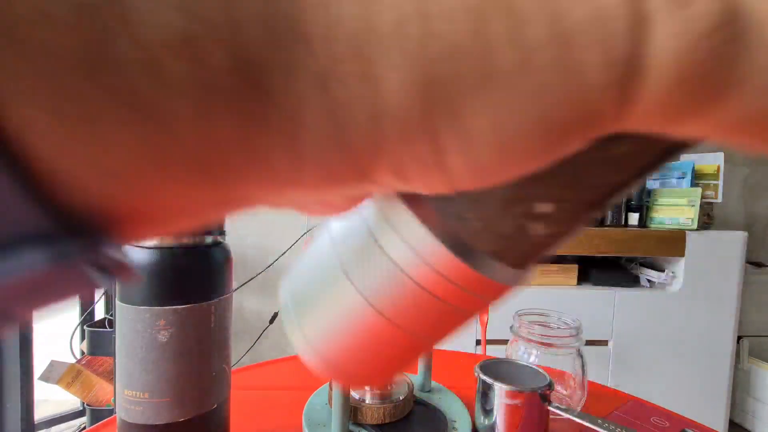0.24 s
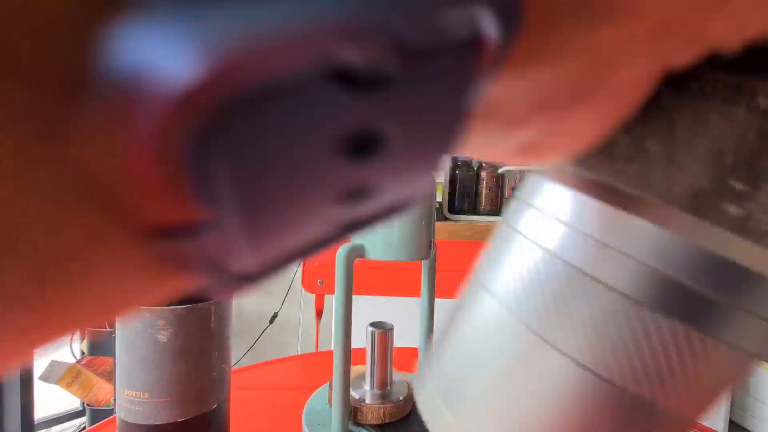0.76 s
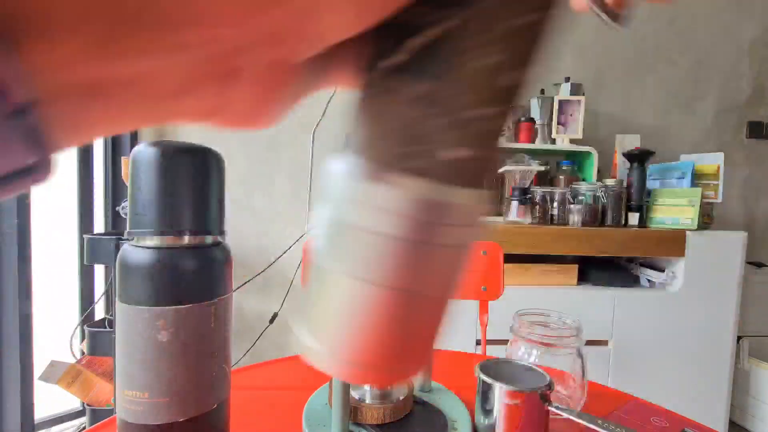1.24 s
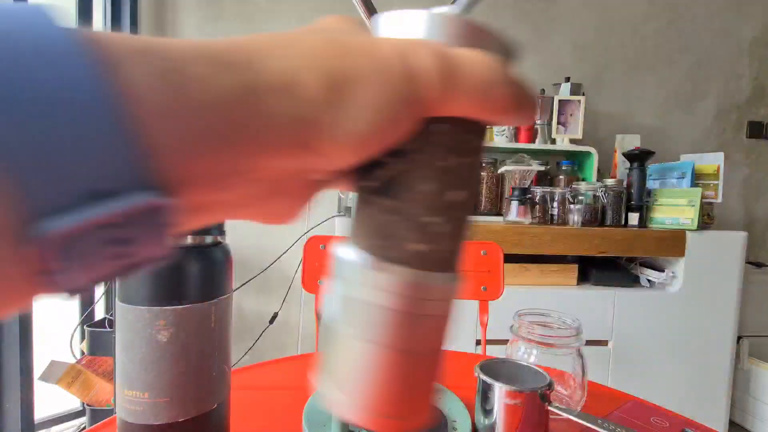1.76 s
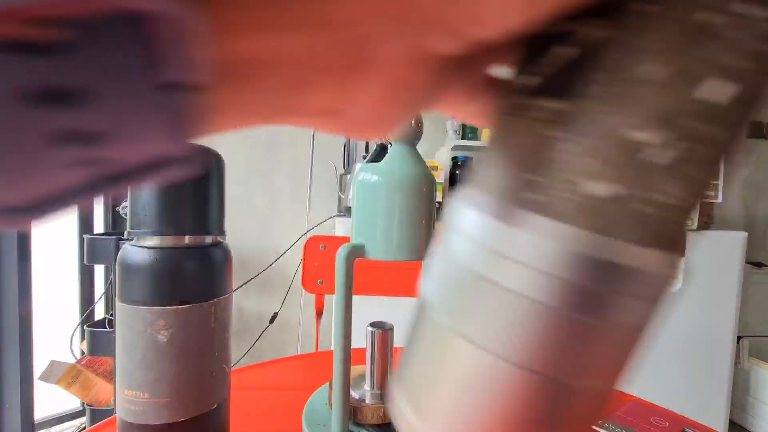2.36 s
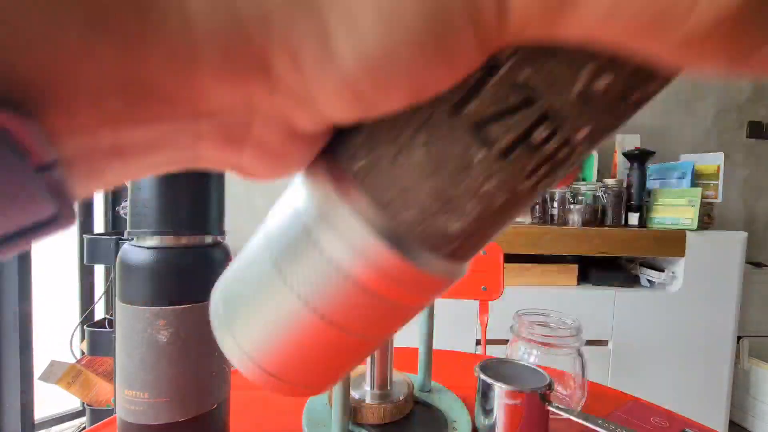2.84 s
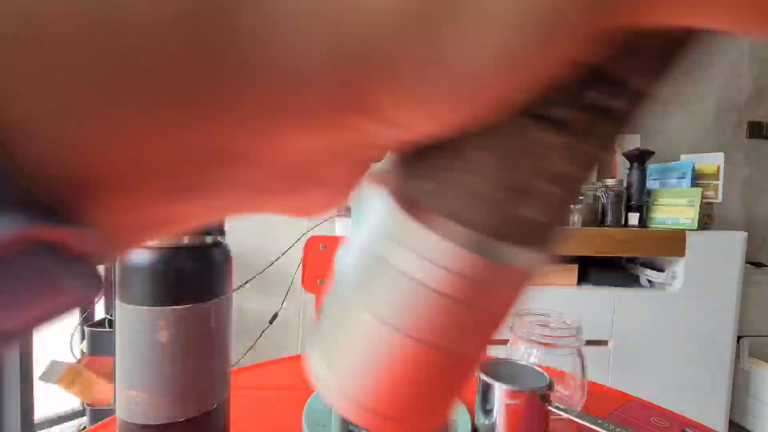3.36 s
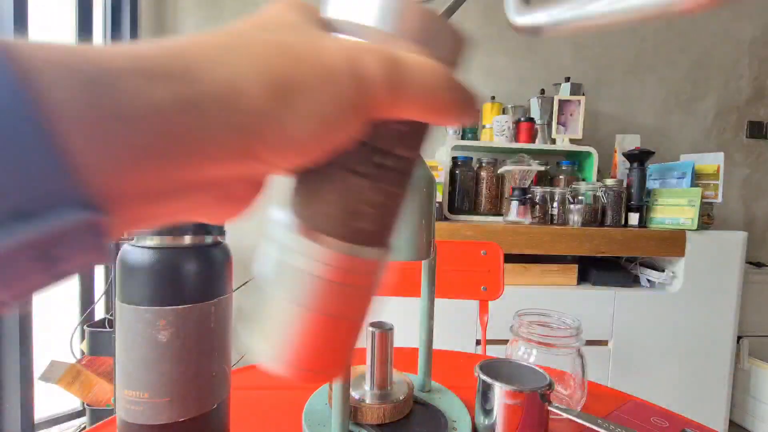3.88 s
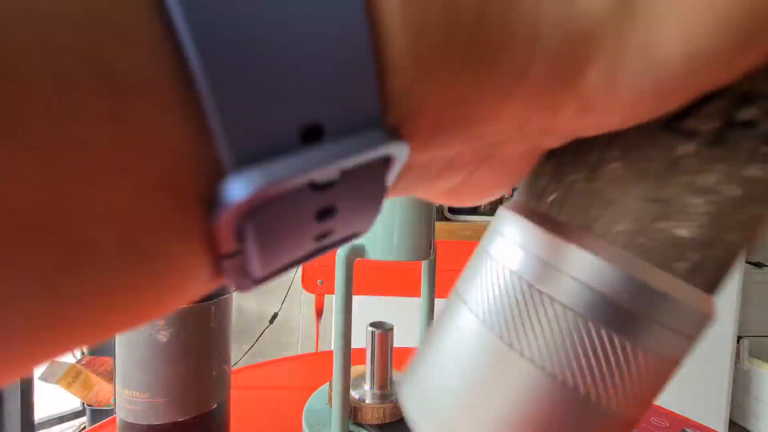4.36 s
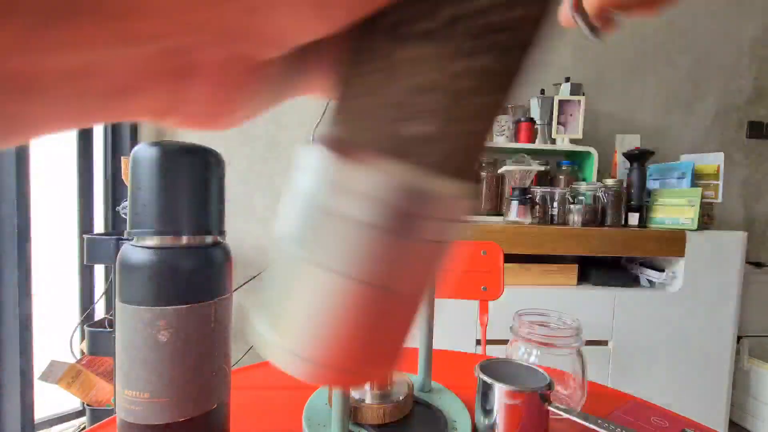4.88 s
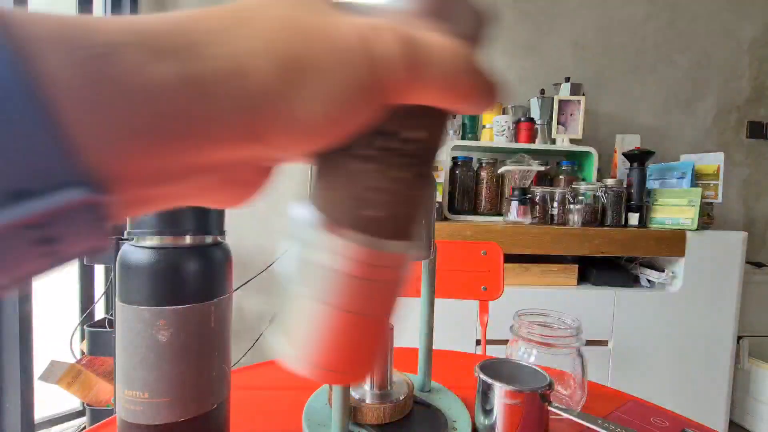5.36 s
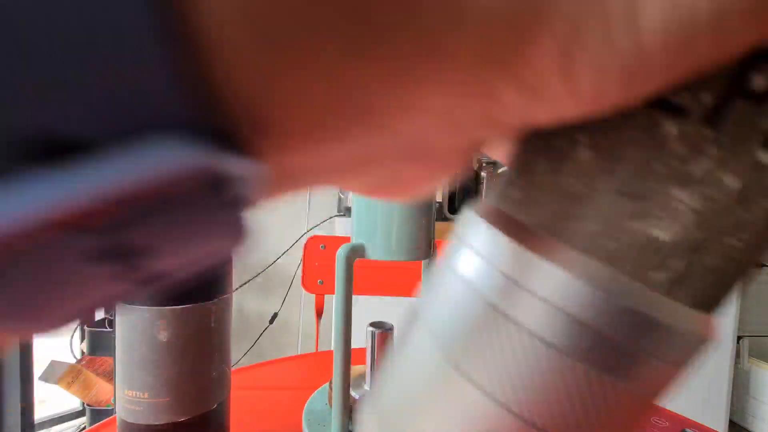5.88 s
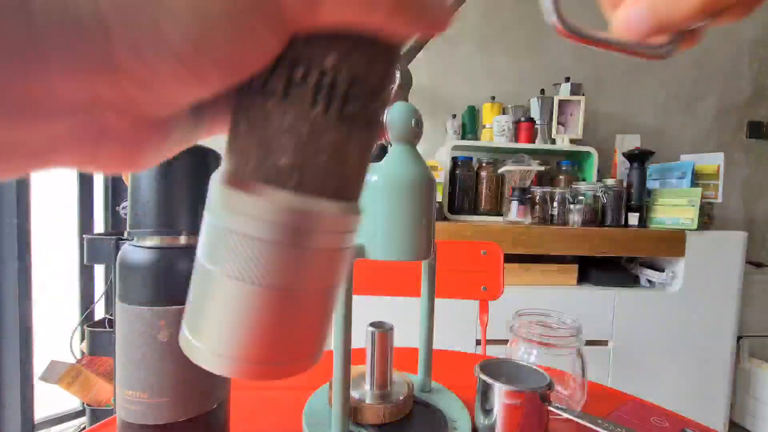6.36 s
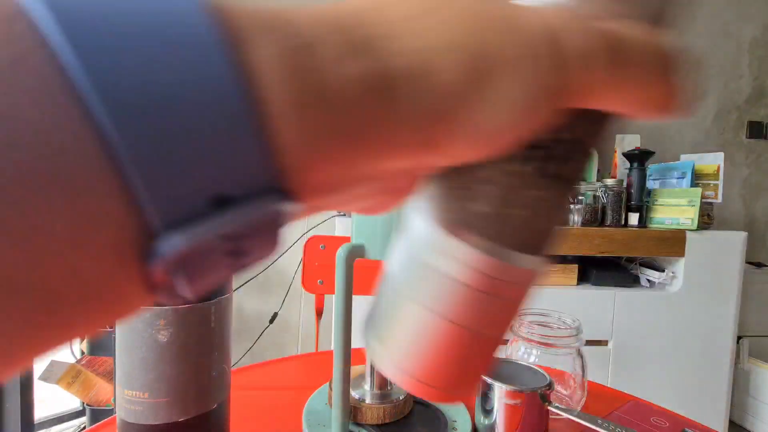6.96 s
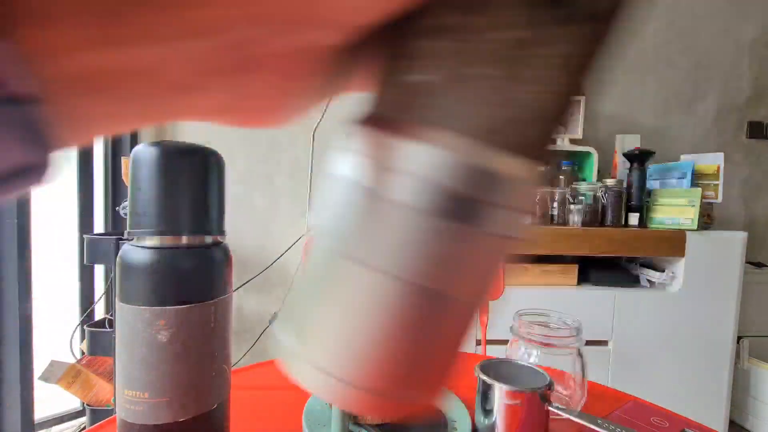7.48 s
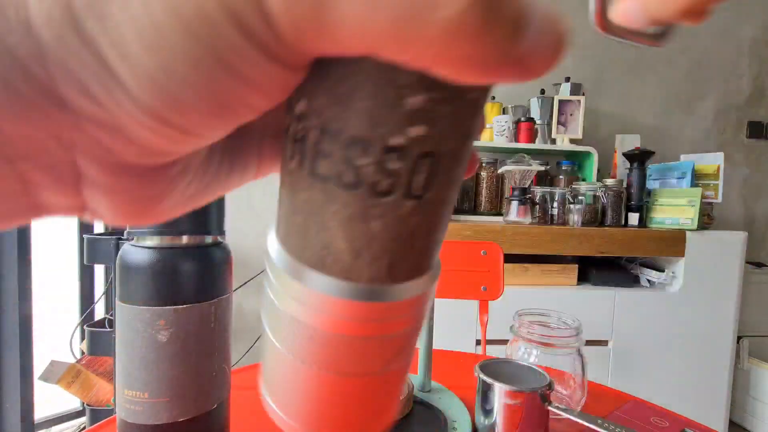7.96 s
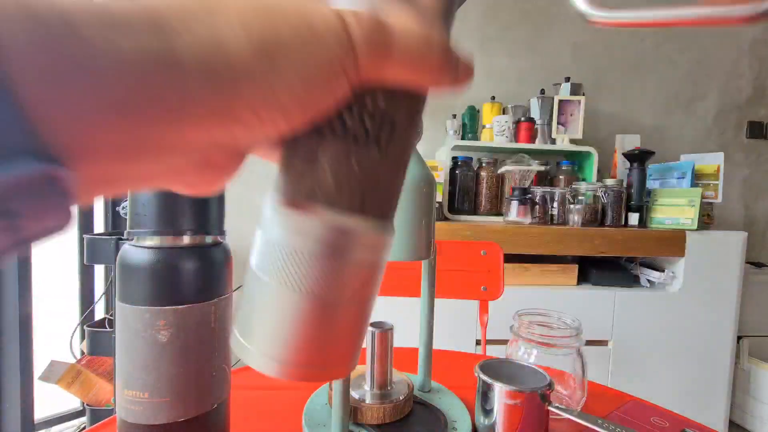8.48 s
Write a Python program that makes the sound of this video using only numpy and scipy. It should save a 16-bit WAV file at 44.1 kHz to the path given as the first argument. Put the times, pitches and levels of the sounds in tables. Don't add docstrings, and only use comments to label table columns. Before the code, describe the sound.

Dense, dry crunching of roasted beans in a metal hand mill, heard close in stereo with a short room tail. Each turn swells and eases, the body ringing and the grounds cup sounding hollow. Early stalls leave short gaps before jolting restarts; more catches come near three seconds and one just after eight. Behind it are low rumble, a soft motor hum and distant engines rising in pitch.

```python
import sys
import numpy as np
from scipy import signal
from scipy.fft import rfft, irfft
from scipy.io import wavfile
from scipy.ndimage import uniform_filter1d, map_coordinates

SR = 44100
rng = np.random.default_rng(int(sys.argv[2]) if len(sys.argv) > 2 else 0)


def undo_db(level):
    steps = np.asarray(level, float) / 20
    return 10 ** steps


def store_wav(level_fs):
    pcm = np.round(np.clip(np.atleast_2d(level_fs), -1, 1) * 32767)
    wavfile.write(sys.argv[1], SR, pcm.T.astype(np.int16))


N = 384993
T_S = np.arange(N) / SR
SIDES = np.array([[.5], [-.5]])

# freq_hz, level_db_per_hz
RUMBLE = [(15, -34), (25, -12), (70, -4.5), (139, -7), (171, -9), (226, -11), (295, -13.5), (436, -20.5),
          (508, -23), (700, -31), (910, -76), (1540, -120)]
# time_s, level_db
RUMBLE_LEVEL = [(0.0, -35), (0.17, -37.5), (1.34, -42), (4.84, -38.5), (4.89, -43.5), (6.95, -35),
                (7.49, -40), (8.73, -37.5)]
# freq_hz, likeness_0_to_1
LIKENESS = [(40, 0.78), (200, 0.94), (400, 0.68), (700, 0.25)]
# freq_hz, level_db_per_hz
HISS_COLOUR = [(400, -14), (900, -2), (2500, -1), (8000, 0), (15000, 0)]
# freq_hz, width_hz, level_db
COMPRESSOR = [(46.6, 2.3, -43.5), (96.4, 3.6, -48.5), (195, 6.5, -55)]
# start_s, end_s, start_hz, end_hz, level_db
ENGINES = [
    (1.05, 1.803, 187.5, 223, -48.5),
    (1.981, 2.6, 260, 265, -48),
    (2.603, 3.103, 191, 200, -47.5),
    (3.297, 3.965, 307, 366, -50.5),
    (4.405, 5.407, 254, 347.6, -48.5),
    (6.276, 7.285, 222, 233, -35.5),
    (6.942, 7.64, 261, 264, -40.5),
    (7.55, 8, 268, 273.5, -41),
]
# push_s, crackle_db, cup_db, slack_share_of_turn, slack_easing_db
TURNS_OF_CRANK = [(.11, -25.5, -18, 0.85, -1.5), (.455, -26.5, -31, 0.15, -10.5),
                  (.86, -25.5, -21, 0.58, -4.5), (1.24, -27, -15.5, 0.64, -7),
                  (1.559, -28.7, -17, 0.65, -5), (2.0, -28.5, -20, 0.64, -2), (2.4, -28, -20, 0.74, -1),
                  (2.75, -30, -21.5, 0.84, -2.5), (3.07, -29.5, -25, 0.17, -3.5),
                  (3.42, -27.5, -22, 0.52, -5), (3.75, -25, -19, 0.48, -7.5),
                  (4.13, -25.5, -18.5, 0.49, -9.5), (4.47, -25.5, -20, 0.62, -3.5),
                  (4.85, -26.9, -19.5, 0.59, -9.5), (5.23, -29, -23, 0.49, -6),
                  (5.61, -27, -22, 0.58, -5.5), (5.95, -27.5, -19.5, 0.51, -5.5),
                  (6.31, -26.5, -19.5, 0.59, -3.5), (6.72, -26.5, -20, 0.67, -2),
                  (7.17, -24.5, -20, 0.41, -5.5), (7.501, -25.5, -18, 0.5, -5),
                  (7.88, -26.5, -21, 0.57, -3.5), (8.42, -27, -22, 0.62, -7), (8.73, -25.5, -21.5, .5, 9)]
# start_s, end_s, start_crackle_db, end_crackle_db, restart_cup_lurch_db
CRANK_STALLS = [
    (0.136, 0.368, -43, -53, -1),
    (0.504, 0.687, -48, -48, 6),
    (1.326, 1.341, -45, -40, -6),
    (2.823, 2.942, -52, -46.5, 0),
    (2.969, 3.009, -42, -33, -6),
    (3.248, 3.293, -52, -30, -0.5),
    (8.039, 8.108, -56, -46, 11.5),
]
# time_s, peak_db
BURR_JOLTS = [(0.461, 8), (0.697, -6), (0.963, -24), (1.276, 9), (2.335, 2), (2.415, 1), (2.745, 10),
              (2.949, -10), (3.366, 5), (3.677, 5.5), (4.062, 5.5), (4.771, 7), (4.87, 4), (5.539, 8.5),
              (5.677, 2), (5.901, 7.5), (6.245, 9), (6.38, -3), (7.028, -10), (7.102, 11), (7.454, 1.5),
              (8.118, 3.5), (8.66, 5.5), (8.701, 6.5)]
# time_s, peak_db, ring_hz, left_right_db
BEAN_SNAPS = [(0.05, -11, 2850, -2), (0.0876, -8, 2500, -2), (0.37, -25, 2710, 4), (0.694, -22, 4000, 0.0),
              (1.1687, -12, 2830, -1), (1.2716, -6, 8340, 1), (2.177, -17, 3530, 2), (2.261, -12, 4510, 0),
              (2.4082, -10, 2780, 4), (2.4645, -12, 6030, 4), (2.744, -4.5, 3900, -1),
              (3.248, -10.5, 2820, 2), (3.3205, -17, 8200, -4), (3.726, -17.5, 3470, -9),
              (4.4288, -10, 3820, -0.5), (4.8815, -9, 2490, 2), (5.8988, -13, 3700, 0),
              (6.1954, -14.5, 8650, 2), (6.241, -17, 3660, -3), (6.327, -13, 2670, -7),
              (6.5008, -17, 3520, 1), (6.7527, -11, 2940, 0), (6.981, -11, 3770, -3),
              (7.0197, -6.5, 6150, 1), (7.442, -10, 3700, 0.5), (7.551, -18, 3720, 9),
              (7.6893, -14, 6800, 8), (7.855, -10.5, 8150, -5), (7.8777, -7, 4280, 1),
              (8.11, -18.5, 8770, 4)]
# time_s, peak_db, ring_hz, left_right_db
CRUMB_TICKS = [(0.1894, -27, 6960, 0.0), (0.239, -26, 9000, -5), (0.2664, -27, 8380, -5),
               (0.2743, -24, 7390, -4), (0.293, -33, 6700, -0.5), (0.3197, -36, 8820, -4),
               (0.381, -11, 9450, 0), (0.6, -26, 6590, 0), (0.6444, -27, 6040, 10), (1.151, -21, 3370, 0),
               (2.248, -12, 8410, 0.5), (2.931, -17, 8100, 2.5), (2.9495, -17, 2760, -2),
               (3.3037, -19, 2610, -6), (4.364, -13, 3720, -4), (4.6823, -10.5, 9000, 11),
               (5.358, -13, 8500, 5), (5.488, -9, 8510, 3), (5.5348, -11, 3600, -6), (6.118, -16, 3470, 16),
               (6.4827, -19, 8840, -1), (7.3008, -11, 3190, 10), (8.0594, -21, 7050, 5)]
# freq_hz, width_hz, left_db, right_db
BODY_MODES = [(780, 13, -29.5, -18), (959, 80, -6, -7), (1075.8, 30, 3.5, 2.5), (1182.5, 65, -2, -8),
              (1267, 233, -12.5, -8)]
# freq_hz, width_hz, left_db, right_db
LID_MODE = [(542, 33, -32.5, -27.5)]
# freq_hz, width_hz, left_db, right_db
WALL_MODES = [(1460, 270, -7, -16), (1620, 200, -10, -26), (1710, 100, -13, -14), (2670, 150, -25, -30)]
# freq_hz, level_db_per_hz
CRACKLE_COLOUR = [(1470, -16), (2500, -0.5), (3100, -4), (3660, -1), (3950, -4.5), (4570, -4.5),
                  (5700, -8.5), (7110, -5.5), (7800, -7.5), (8680, -3), (10700, -11), (14900, -14.5),
                  (15500, -6.5)]
# freq_hz, left_right_db
CRACKLE_BALANCE = [(2500, 2), (5500, 1), (7200, 3), (8600, -2.5), (15000, .5)]


def evened(x):
    return x / np.sqrt(np.mean(x ** 2) + 1e-20)


def read(points, hz):
    point_hz, value = np.transpose(points)
    return np.interp(np.log(hz + 1), np.log(point_hz + 1), value)


def coloured(x, gain_db):
    return irfft(rfft(x) * undo_db(gain_db), x.shape[-1])


def mode(x, hz, width_hz):
    r = np.exp(-np.pi * width_hz / SR)
    turn = np.exp(2j * np.pi * hz / SR)
    return 2 * signal.lfilter([1 - r], [1, -r * turn], x).real


def lumps(per_s):
    span = int(SR / per_s)
    smooth = uniform_filter1d(rng.standard_normal(N), span)
    return evened(uniform_filter1d(smooth, span))


def room_rumble():
    hz = np.fft.rfftfreq(N, 1 / SR)
    left, apart = rfft(rng.standard_normal((2, N)))
    same = np.clip(read(LIKENESS, hz), 0, 1)
    pair = np.array([left, same * left + np.sqrt(1 - same ** 2) * apart])
    rumble = evened(irfft(pair * undo_db(read(RUMBLE, hz)), N))
    level_db = np.interp(T_S, *np.transpose(RUMBLE_LEVEL)) - 0.5
    hiss = evened(coloured(rng.standard_normal((2, N)), read(HISS_COLOUR, hz)))
    return rumble * undo_db(level_db) + undo_db(-59.5) * hiss


def compressor_hum():
    hum = np.zeros(N)
    for hz, width_hz, level_db in COMPRESSOR:
        waver = evened(mode(rng.standard_normal(N), hz, width_hz))
        hum += undo_db(level_db) * evened(np.sin(2 * np.pi * hz * T_S) + 0.2 * waver)
    return hum


def distant_engines():
    engines = np.zeros((2, N))
    waver_hz, flutter_db = 2.46 * lumps(7.6), 2.1 * lumps(41)
    port_phase_rad = np.array([[0], [.6]])
    for start_s, end_s, start_hz, end_hz, level_db in ENGINES:
        way = np.clip((T_S - start_s) / (end_s - start_s), 0, 1)
        turns = np.cumsum(start_hz + (end_hz - start_hz) * way + waver_hz) / SR
        swell = undo_db(level_db + flutter_db) * np.sin(np.pi * way) ** 0.47
        engines += swell * np.sin(2 * np.pi * turns + port_phase_rad)
    return engines


def swing(angle, size_of, top_turn):
    return size_of * np.cos(2 * np.pi * (angle - top_turn))


def crank():
    edge_turn_s = 0.16
    ring_at_db, ring_db, ring_follows = -31.5, 12, 0.81
    stop_s, start_s = .013, .004
    push_s, push_db, near_db, share, ease_db = np.transpose(TURNS_OF_CRANK)
    turn_s = np.diff(push_s, append=push_s[-1] + edge_turn_s)
    slack_s = push_s + np.clip(share, .15, .85) * turn_s
    knots_s = np.append(push_s[0] - edge_turn_s / 2, np.ravel([push_s, slack_s], order="F"))
    angle = np.interp(T_S, knots_s, (np.arange(len(knots_s)) - 1) / 2)
    turn = np.arange(len(push_s))

    slack = (1 - np.cos(2 * np.pi * angle)) / 2
    eased_db = np.interp(angle, turn + .5, ease_db)
    force_db = np.interp(angle, turn, push_db) + eased_db * slack
    body_db = ring_at_db + ring_db + ring_follows * (force_db - ring_at_db) + 1.5 * lumps(33)
    body_db = body_db + swing(angle, 0.18, -0.096)
    cup_slack = (.5 - swing(angle, .5, -0.013)) ** 0.63
    cup_db = np.interp(angle, turn, near_db) + (1.5 + 1.38 * eased_db) * cup_slack

    for start, end, start_db, end_db, lurch_db in CRANK_STALLS:
        cup_db = cup_db + lurch_db * (T_S > end) * np.exp(-abs(T_S - end) / 0.059)
        held_s = [start, start + stop_s, end - start_s / 2, end + start_s / 2]
        held = np.interp(T_S, held_s, [0, 1, 1, 0])
        left_db = np.interp(T_S, [start, end], [start_db, end_db])
        force_db = force_db + held * (left_db - force_db)
        body_db = body_db + held * (left_db + 8 - body_db)
        cup_db = cup_db + held * (left_db + 3 - cup_db)
    return angle, force_db, body_db, cup_db


def cracks(per_s, spread_db):
    size = undo_db(spread_db * np.minimum(rng.exponential(1, N), 5)) * rng.choice([-1, 1], N)
    clumps = undo_db(0.5 * lumps(22) + 0.32 * lumps(160))
    return evened(size * (rng.random(N) < per_s / SR) * clumps)


def placed(times_s, db):
    train = np.zeros(N)
    train[np.minimum((times_s * SR).astype(int), N - 1)] = undo_db(db)
    return train


def ring(x, modes):
    rung = 0
    for k, (hz, width_hz, left_db, right_db) in enumerate(modes):
        rung = rung + (-1) ** k * undo_db(np.array([[left_db], [right_db]])) * mode(x, hz, width_hz)
    return rung


def gliding(x, hz, width_hz):
    turn = np.exp(2j * np.pi * np.cumsum(hz) / SR)
    r = np.exp(-np.pi * width_hz / SR)
    return 2 * (turn * signal.lfilter([1 - r], [1, -r], x / turn)).real


def delay_right(pair, lag_samples):
    pair[1] = map_coordinates(pair[1], [np.arange(N) - lag_samples], order=3)
    return pair


def shaded(x, patchy_db):
    z = signal.stft(x, nperseg=256, noverlap=128)[2]
    patches = rng.standard_normal(z.shape)
    patches = uniform_filter1d(uniform_filter1d(patches, size=4, axis=1), size=10, axis=2)
    patches = evened(uniform_filter1d(patches, size=8, axis=2))
    patched = signal.istft(z * undo_db(patchy_db * patches), nperseg=256, noverlap=128)[1]
    return evened(patched[:, :N]) * np.std(x)


def metal_body(push, angle):
    jolts = np.array(BURR_JOLTS)
    shoves = 45 * mode(placed(jolts[:, 0], jolts[:, 1]), 860, 370)
    bass_cut = signal.butter(3, 760, "high", fs=SR, output="sos")
    body = signal.sosfilt(bass_cut, ring(push + shoves, BODY_MODES))
    rattle = ring(push * undo_db(3.6 * lumps(28.0)), LID_MODE)
    body += mode(rattle, LID_MODE[0][0], 91)
    body = delay_right(body, 1.6 + swing(angle, 2.3, 0.39))
    return body * undo_db(swing(angle, 1.8, 0.47) * SIDES)


def grounds_cup(drive, angle):
    walls = ring(drive * undo_db(swing(angle, 2.5, 0.15)), WALL_MODES) * 2 * SIDES
    mouth_hz = 1960 + swing(angle, 111, -0.15)
    mouth = undo_db(np.array([[4], [0.2]])) * gliding(gliding(drive, mouth_hz, 316), mouth_hz, 525)
    mouth = signal.sosfilt(signal.butter(2, 2140, fs=SR, output="sos"), mouth)
    mouth = delay_right(mouth, 7.24 + swing(angle, 5.8, 0.45))
    return mouth * undo_db(swing(angle, 2.5, 0.17) * SIDES) - walls


def crackle_gain_db(count):
    hz = np.fft.rfftfreq(count, 1 / SR)
    return read(CRACKLE_COLOUR, hz) + SIDES * read(CRACKLE_BALANCE, hz)


def airborne_crackle(grit, force_db):
    scatter = np.sqrt(signal.lfilter([1], [1, -undo_db(-120 / (0.019 * SR))], grit ** 2))
    crackle = coloured(scatter * rng.standard_normal((2, N)), crackle_gain_db(N))
    crackle = shaded(evened(crackle), 3.16) * undo_db(force_db + 3.5)
    loose = np.interp(T_S, [.367, .4395, .512], [.5, 1, .5], 0, 0)
    return crackle + undo_db(7.5) * loose * mode(crackle, 2730, 330)


def bursts(events, t60_s, ring_db):
    size, lead = 1024, 64
    out = np.zeros((2, N + size))
    decay = undo_db(-60 * np.arange(size) / SR / t60_s)
    bins_hz = np.fft.rfftfreq(size, 1 / SR)
    for time_s, peak_db, hz, pan_db in events:
        raw = np.roll(rng.standard_normal((2, size)) * decay, lead, -1)
        peak = ring_db / (1 + ((bins_hz - hz) / 450) ** 2)
        burst = coloured(raw, crackle_gain_db(size) + peak)
        at = max(round(time_s * SR) - lead, 0)
        out[:, at:at + size] += burst / abs(burst).max() * undo_db(peak_db + pan_db * SIDES)
    return out[:, :N]


def grinder():
    angle, force_db, body_db, cup_db = crank()
    grit, snaps = cracks(3500, 2.85), np.array(BEAN_SNAPS)
    stuck = uniform_filter1d(placed(np.array(BURR_JOLTS)[:, 0], 0), size=500, origin=-240) * 500
    grit = grit * undo_db(-4 * uniform_filter1d(np.minimum(stuck, 1), size=60))
    blows = 5 * placed(snaps[:, 0], snaps[:, 1])
    scale = np.sqrt(np.mean(ring(grit, BODY_MODES) ** 2))
    body = metal_body(grit * undo_db(body_db) / scale + blows, angle)
    cup_grit = np.array([grit, 0.7 * grit + 0.43 * cracks(3500, 0.9)])
    cup = grounds_cup(cup_grit * undo_db(cup_db - 2.5) / scale + 0.71 * blows, angle)
    snapping = bursts(BEAN_SNAPS, 0.032, 8.2) * undo_db(4.5)
    ticking = bursts(CRUMB_TICKS, 0.016, 10)
    return shaded(body + cup, 2.08) + airborne_crackle(grit, force_db) + snapping + ticking


def kitchen(x):
    count, gap = SR // 2, 20
    taps = np.zeros((2, count))
    at = np.arange(200, count - gap, gap) + rng.integers(0, gap, (2, (count - 201) // gap))
    np.put_along_axis(taps, at, rng.choice([-1., 1.], at.shape), 1)
    hz, t, z = signal.stft(taps, SR, nperseg=256)
    t60_s = read([(500, 0.26), (4000, 0.28), (12000, 0.25)], hz)[:, None]
    tail = signal.istft(z * undo_db(-60 * t / t60_s), SR, nperseg=256)[1]
    return signal.fftconvolve(x, tail / np.linalg.norm(tail[0]), axes=1)[:, :N]


def scene():
    background = room_rumble() + compressor_hum() + distant_engines()
    near = grinder()
    return near + undo_db(-14) * kitchen(near) + background


def top_cut(x):
    return signal.sosfilt(signal.butter(12, 16210, fs=SR, output="sos"), x)


def record(dry):
    cut = signal.sosfilt(signal.butter(4, 38, "high", fs=SR, output="sos"), dry)
    limited = np.tanh(1.2 * cut) * .98
    lowpass = signal.firwin(255, 15480, window=("kaiser", 8), fs=SR)
    mix = signal.oaconvolve(limited, lowpass[None], "same")
    return top_cut(mix)


dry = scene()
out = record(dry)
store_wav(out)
```